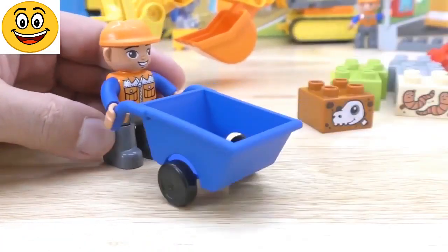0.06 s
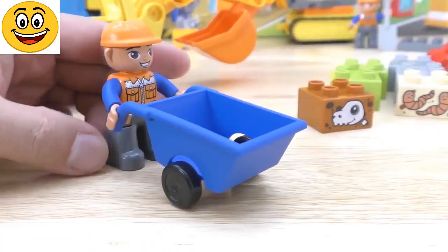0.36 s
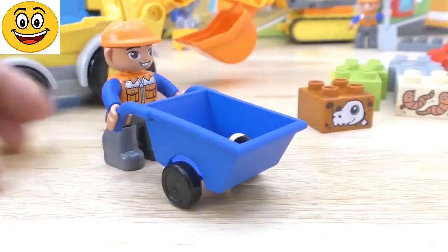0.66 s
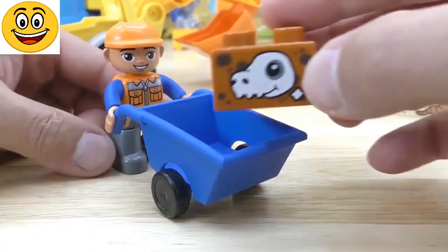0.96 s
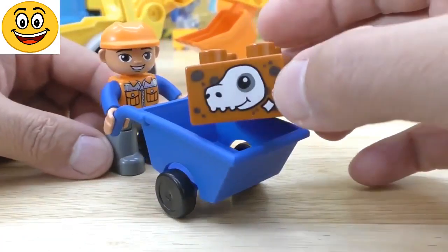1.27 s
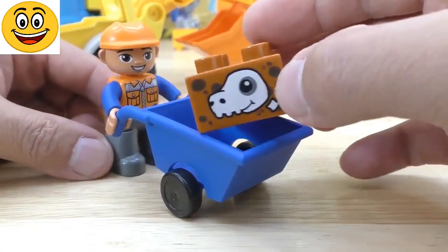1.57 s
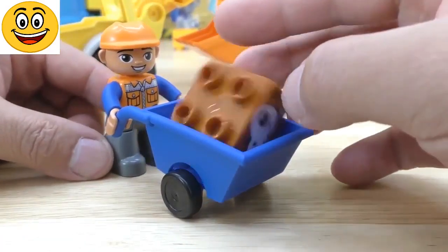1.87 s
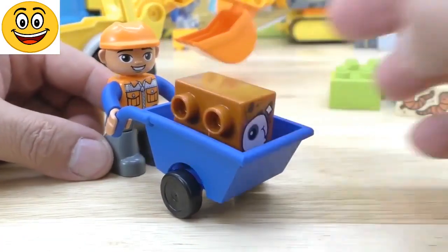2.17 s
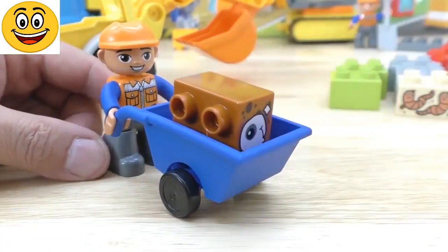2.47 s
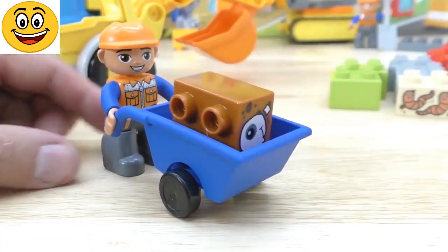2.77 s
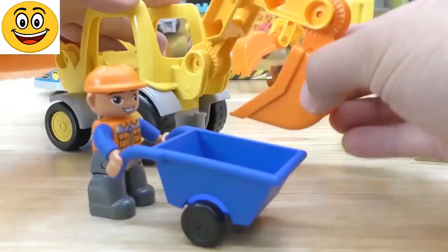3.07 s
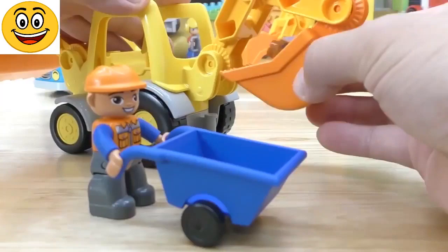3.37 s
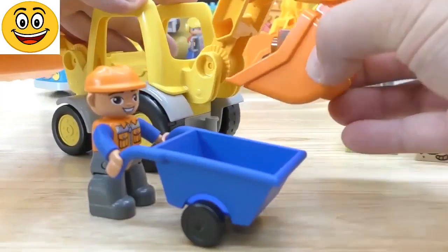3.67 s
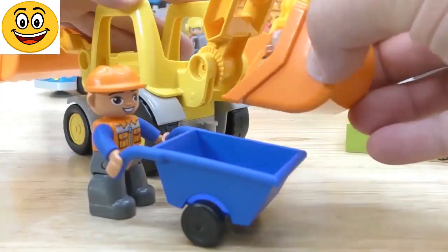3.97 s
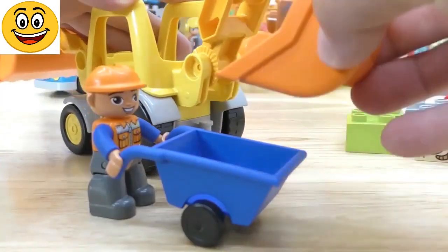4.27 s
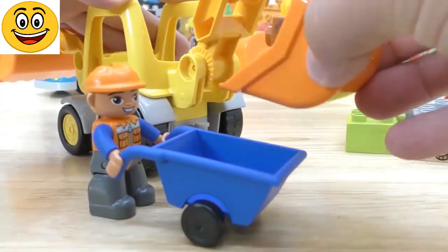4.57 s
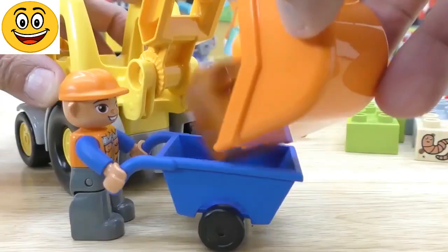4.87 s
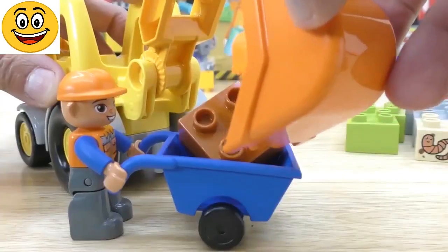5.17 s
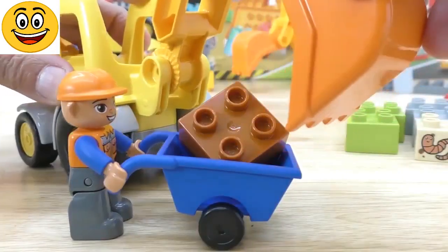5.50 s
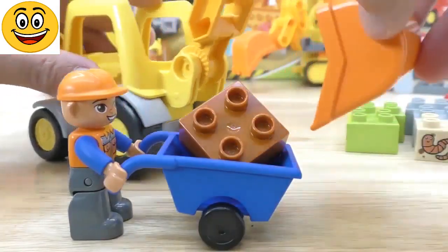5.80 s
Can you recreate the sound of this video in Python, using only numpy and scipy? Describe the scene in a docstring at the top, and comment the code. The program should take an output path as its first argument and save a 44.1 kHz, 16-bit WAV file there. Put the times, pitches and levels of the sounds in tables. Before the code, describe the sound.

Hard plastic toy bricks clatter into a toy wheelbarrow, and a toy digger's arm creaks and clicks, close up on a wooden table.

```python
"""At a wooden table in a small room, plastic toys are played with close to the microphone.
A hollow brick drops into a toy wheelbarrow and rings as it bounces. A digger's jointed arm creaks and
clicks as its joints stick and slip, then its shovel tips a second brick in. Firm blows thump the table.
Fingers and toys rub between the clicks, over a faint rumble and hiss."""
import sys
import numpy as np
from scipy import signal
from scipy.fft import rfft, irfft
from scipy.io import wavfile

SR = 44100
rng = np.random.default_rng(int(sys.argv[2]) if len(sys.argv) > 2 else 0)


def to_wav(sig):
    """Store sig (one row per channel, or 1-D mono) as 16-bit WAV at the path in sys.argv[1].

    Samples outside -1..1 are clipped; the rate is SR.
    """
    pcm = np.clip(np.atleast_2d(sig), -1, 1) * 32767
    pcm = np.round(pcm).astype(np.int16)
    wavfile.write(sys.argv[1], SR, pcm.T)  # frames by channels


N = 266364
TIME = np.arange(N) / SR
BLOW_TIME = np.arange(SR // 5) / SR  # the seconds within one blow

# Brick, barrow and shovel knock together.
# Each row: start in seconds, ring level in dB, tick level in dB, favoured pitch in Hz.
KNOCKS = [(0.608, -60.5, -68.5, 1420), (1.2646, -63, -68.5, 1420), (1.3217, -63, -73, 2780),
          (1.3699, -54, -73, 1480), (1.3983, -40.5, -53.5, 2690), (1.899, -49.5, -61, 1640),
          (1.9431, -46, -73, 2090), (1.955, -56, -59.5, 2030), (2.0747, -35, -43.5, 2080),
          (2.083, -26.5, -35, 2140), (2.1044, -36, -52, 3080), (2.1163, -37, -39, 4050),
          (2.181, -50, -61, 2200), (2.206, -38.5, -44, 2760), (2.2285, -43, -43, 1530),
          (2.2744, -52, -63, 1900), (2.6168, -57, -60, 1420), (4.9529, -57.5, -64, 4100),
          (5.005, -50, -63, 1890), (5.0096, -43.5, -44, 1830), (5.0793, -51, -59, 1770),
          (5.1256, -30.5, -38.5, 3260), (5.136, -42, -42, 1600), (5.1428, -31, -33, 2580),
          (5.2423, -51, -66, 2020), (5.4132, -49, -52, 2027), (5.6823, -55, -82, 1530),
          (6.0183, -51.5, -59.5, 2110)]
# The joints of the digger's arm slip.
# Each row: start in seconds, then the levels in dB of the hollow tone, the wall ring and the tick.
SLIPS = [(3.0565, -65, -47, -55), (3.0657, -62, -37.5, -43), (3.0847, -65, -47, -46.5),
         (3.1116, -61, -40, -47.5), (3.1231, -50, -42, -45), (3.1317, -63, -44, -46),
         (3.1925, -36.5, -44, -49), (3.2041, -40, -44.5, -49.5), (3.222, -55, -46.5, -50.5),
         (3.27, -41.5, -51, -55), (3.4051, -36.5, -46.5, -45), (3.4209, -60, -40.5, -45),
         (3.433, -51, -53, -52), (3.4534, -37, -50, -46.5), (3.461, -36.5, -39.5, -53),
         (3.4683, -39, -38, -45), (3.4818, -42, -50, -56), (3.5214, -39, -44.5, -56.5),
         (3.5414, -45.5, -47, -62), (3.5748, -56, -46.5, -56), (3.6036, -44, -54, -61),
         (3.615, -43.5, -54.5, -66), (3.648, -49.5, -63, -78), (4.1069, -39.5, -40, -38),
         (4.126, -37, -46, -56), (4.1515, -38, -41.5, -46.5), (4.1587, -58, -41.5, -45.5),
         (4.1692, -60, -43.5, -44), (4.2587, -39.5, -40, -46), (4.264, -35.5, -38, -33.5),
         (4.3084, -36, -45.5, -44.5), (4.3237, -47, -51, -58), (4.373, -45.5, -53, -60),
         (4.4, -38.5, -40, -45), (4.6635, -46.5, -49, -39.5), (4.7047, -47.5, -66, -65)]
# The tones of brick and barrow. Each row: pitch in Hz, level in dB, fade time in seconds.
BRICK_TONES = [(1037, -40, 0.016), (1400, -19, 0.032), (1608, -1, 0.1), (1982, 7, 0.026),
               (2060, -11, 0.023), (2489, 18, 0.0074), (2763, -7, 0.055), (3060, -1, 0.018),
               (3190, 1.5, 0.026), (3220, -23, 0.0068), (3977, -5, 0.104), (4015, 5.5, 0.03)]
# The noise colours of hard contact and of thin shells. Each row: frequency in Hz, level in dB.
TICK_COLOUR = [(500, -29), (1500, -15.5), (4000, 2.5), (6000, -1.5), (8000, -7), (11000, -4),
               (14000, -11.5), (16000, -22)]
SHELL_COLOUR = [(300, -8.5), (650, -31), (1100, 8), (2000, 6.5), (3200, 9), (4500, -23), (7000, -29)]


def gain(db):
    """Turn decibels into a number to multiply by."""
    return 10 ** (np.asarray(db) / 20)


def fade(t, t60):
    """Die away by 60 dB in t60 seconds, the fade time."""
    return np.exp(-np.log(1000) * t / t60)


def noise(colour, size):
    """Noise of average (rms) level 1; its colour says how strong each frequency is."""
    hz, db = np.transpose(colour)
    freqs = np.maximum(np.fft.rfftfreq(size, 1 / SR), 1)
    shape = gain(np.interp(np.log(freqs), np.log(hz), db))
    sound = irfft(rfft(rng.standard_normal(size)) * shape, size)
    return sound / sound.std()


def wander(per_s):
    """A value that drifts at random, by about 1 either way."""
    points = rng.standard_normal(int(N / SR * per_s) + 2)
    return np.interp(TIME * per_s, np.arange(len(points)), points)


def at_level(x, db, first_s=0.0055):
    """Scale a blow so that its first moments have the given average level."""
    return x * gain(db) / np.sqrt(np.mean(x[:int(first_s * SR)] ** 2))


def add(track, start, x):
    """Mix a sound into a track, start seconds in."""
    i = max(int(start * SR), 0)
    track[i:i + len(x)] += x[:max(N - i, 0)]


def cut_lows(x, hz):
    """Weaken everything below hz."""
    return signal.sosfilt(signal.butter(2, hz, "high", fs=SR, output="sos"), x)


def ring(tones, scatter_db, detune, spot_hz=2000, spot_db=0, spot_width=0.17):
    """A struck object's fading tones vary by chance; the spot that is hit favours those near spot_hz."""
    hz, db, t60 = np.transpose(tones)
    weight, stretch, sign = rng.standard_normal((3, len(hz)))
    db = db + scatter_db * weight + spot_db * np.exp(-(np.log(hz / spot_hz) / spot_width) ** 2)
    hz = hz * (1 + detune * stretch)
    waves = np.sin(2 * np.pi * hz[:, None] * BLOW_TIME) * fade(BLOW_TIME, t60[:, None])
    return (np.sign(sign) * gain(db)) @ waves


def burst(colour, t60):
    """Countless overlapping tones blur into a short puff of noise."""
    return at_level(noise(colour, len(BLOW_TIME)) * fade(BLOW_TIME, t60), 0)


def contact(x, rise_s):
    """The sound builds up while two surfaces press together."""
    return x * (1 - np.exp(-BLOW_TIME / rise_s))


def stroke(start, end):
    """A hand movement speeds up and slows down again."""
    return np.sin(np.pi * np.clip((TIME - start) / (end - start), 0, 1))


def stereo(mid, side, side_db, side_top_hz):
    """Two close microphones, left and right; the treble is nearly the same in both."""
    side = gain(side_db) * signal.sosfiltfilt(signal.butter(1, side_top_hz, fs=SR, output="sos"), side)
    return np.array([mid + side, mid - side])


def background(hiss_db=-14.5):
    """Background rumble and hiss are turned down around the loud clicks, then come back."""
    # The colours of the three noises. Each row: frequency in Hz, level in dB.
    rumble_colour = [(20, -18), (45, 2.5), (80, 4.5), (130, -4), (200, -4), (400, -13), (1000, -81)]
    air_colour = [(30, -27), (100, -9), (190, 3), (270, 1.5), (370, 1.5), (650, -8.5), (1200, -4.5),
                  (2000, -4.5), (2700, -10), (4200, -18), (8000, -24), (16000, -20.5)]
    hiss_colour = [(1500, -57), (3500, -13), (4800, -15.5), (6100, 13), (8000, 1.5), (10500, 10.5),
                   (13000, 8.5), (16000, -17)]
    # How far the background is turned up or down.
    # Each row: time in seconds, rumble level in dB, air level in dB.
    loudness = [(0.0, -75.5, -65), (0.85, -79.5, -67), (1.08, -70.5, -67), (2.05, -70.5, -64.5),
                (2.35, -76.5, -69), (3.05, -75.5, -65.5), (3.22, -96, -76), (4.0, -90, -69.5),
                (4.55, -87, -74), (5.03, -79, -65.5), (5.3, -90, -77), (6.04, -82, -68.5)]
    times, *levels = np.transpose(loudness)
    rumble_db, air_db = (np.interp(TIME, times, db) for db in levels)
    mid, side = (gain(rumble_db + 2.45 * wander(27)) * noise(rumble_colour, N)
                 + gain(air_db + 1.8 * wander(14)) * noise(air_colour, N) for _ in range(2))
    hiss = gain(air_db + hiss_db) * noise(hiss_colour, N)
    return stereo(mid + hiss, side, side_db=-8, side_top_hz=3240)


def rubbing():
    """Sliding catches on the grain and stirs the hollow shells; each surface hisses at its own pitch."""
    # Toys and fingers slide. Each row: start and end in seconds, relative drag and hiss levels in dB,
    # hiss pitch and width in Hz.
    rubs = [(0.01, 0.19, -63, -70, 11000, 4000), (0.18, 0.311, -50.5, -65.5, 10700, 300),
            (0.724, 1.074, -62, -65, 9750, 10000), (1.792, 1.88, -58, -60, 4070, 298),
            (1.854, 2.116, -64.5, -68, 4100, 600), (2.93, 3.078, -61, -69.5, 4020, 3000),
            (3.838, 3.93, -61.5, -78.5, 11500, 1500), (4.91, 5.146, -74, -66.5, 8100, 6000),
            (5.372, 5.654, -75.5, -68, 5100, 1395), (5.849, 6.14, -57.5, -69.5, 3960, 4000)]
    # The colours of sliding toys and of skin. Each row: frequency in Hz, level in dB.
    slide_colour = [(100, -18), (230, -11), (360, 6), (700, -8), (1150, 5.5), (2000, -3.5), (3100, -8),
                    (3800, -18), (8000, -26.5), (16000, -31)]
    skin_colour = [(1000, 5.5), (3000, 11), (4200, 7.5), (7000, 1), (10700, 7), (13000, 4), (16000, -11)]
    shell = signal.fftconvolve(noise(slide_colour, N), ring(BRICK_TONES, scatter_db=1, detune=0.003))[:N]
    drag = noise(slide_colour, N) + gain(-4) * shell / shell.std()
    out, skin = np.zeros(N), noise(skin_colour, N)
    for start, end, drag_db, hiss_db, hz, width_hz in rubs:
        hiss = signal.lfilter(*signal.iirpeak(hz, hz / width_hz, fs=SR), skin)
        hiss = hiss / hiss.std() + gain(-10) * skin
        out += stroke(start, end) * (gain(drag_db) * drag + gain(hiss_db) * hiss)
    grain = gain(3 * wander(350) - 6)
    return grain * out


def handling(per_s=14, loudest_db=-67, range_db=14):
    """Loose parts of the held toys give tiny ticks at random moments."""
    out = np.zeros(N)
    for when, softness in rng.random((int(per_s * N / SR), 2)):
        click = burst(SHELL_COLOUR, t60=0.011) + gain(-21) * burst(TICK_COLOUR, t60=0.017)
        add(out, when * N / SR, gain(loudest_db - range_db * softness) * click)
    return out


def brick():
    """The hollow brick strikes, bounces and settles in the barrow, ringing at each knock."""
    # The plastic's purest tones outlast the clack. Each row: pitch in Hz, level in dB, fade in seconds.
    lasting_tones = [(1993, -9, 0.12), (2570, -16, 0.049), (3180, -5.5, 0.15), (4010, -4, 0.13)]
    out = np.zeros(N)
    for start, ring_db, tick_db, hz in KNOCKS:
        tones = ring(BRICK_TONES, scatter_db=3, detune=0.0014, spot_hz=hz, spot_db=13.5, spot_width=0.1)
        struck_face = ring([(hz, 0, 0.018)], scatter_db=0, detune=0.0038)
        clack = at_level(tones, 0) + at_level(struck_face, -2) + gain(-5) * burst(SHELL_COLOUR, t60=0.049)
        clack *= fade(BLOW_TIME, 0.1)  # touching the barrow quiets the walls
        after_ring = at_level(ring(lasting_tones, scatter_db=3, detune=0.002), -14.5)
        body = cut_lows(clack + after_ring, hz * 0.5)  # a stiff corner hardly stirs the low tones
        body = at_level(contact(body, rise_s=0.000068), ring_db)
        add(out, start, body + gain(tick_db) * tick(t60=0.014, edge_db=-6.5))
    return out


def tick(t60, edge_db, usual_hz=6100, scatter_octaves=0.15):
    """Hard edges meet with a bright crack and a brief ring; the pitch depends on which edges touch."""
    # The tones of small stiff edges. Each row: pitch in Hz, level in dB, fade time in seconds.
    edge_tones = [(5080, 2, 0.02), (4900, -30, 0.017), (5490, -1, 0.034), (5740, 0.5, 0.017),
                  (6630, -19, 0.0077), (6640, 5.5, 0.02), (7480, 3, 0.0086), (7400, -12, 0.009),
                  (8970, 8.5, 0.011), (10400, -10, .009), (10700, -32, 0.0073), (12000, -11, 0.0052)]
    hz = np.clip(usual_hz * 2 ** (scatter_octaves * rng.standard_normal()), SR / 10, SR / 3)
    edge = ring(edge_tones, scatter_db=2, detune=0.0544, spot_hz=hz, spot_db=6.5, spot_width=0.032)
    crack = burst(TICK_COLOUR, t60)
    pitched_crack = signal.lfilter(*signal.iirpeak(hz, 3.5, fs=SR), crack)
    click = crack + at_level(pitched_crack, -15.5) + at_level(edge, edge_db)
    return at_level(contact(click, rise_s=0.00037), 0)


def thuds(share_db=-20):
    """The brick's weight gives each knock a dull thud with no clear pitch."""
    # The colour of a thud. Each row: frequency in Hz, level in dB.
    thud_colour = [(20, 0), (50, 6.5), (150, 5), (350, 5), (600, -1.5), (1050, -7), (1500, -23),
                   (3000, -60)]
    out = np.zeros(N)
    for start, db, _, _ in KNOCKS:
        add(out, start, gain(db + share_db) * contact(burst(thud_colour, t60=0.038), rise_s=0.00032))
    return out


def thump(db, hz, t60):
    """A struck board gives three short tones and little sound below its main pitch."""
    tones = ring([(hz, 0, t60), (hz * 0.58, -11, t60), (hz * 1.9, -12, t60 / 2)],
                 scatter_db=2.5, detune=0.028)
    return at_level(cut_lows(tones, hz * 0.75), db, first_s=0.03)


def table_thumps(barrow_hz=366.4, digger_hz=176.4):
    """The table answers blows with low thumps, louder for harder ones; the barrow's tub knocks once."""
    # The digger's wheels bump softly on the table. Each row: start in seconds, level in dB.
    wheel_bumps = [(2.617, -63.5), (2.984, -64), (3.739, -65), (3.876, -69), (4.108, -55.5), (5.415, -57),
                   (5.89, -67)]
    knocks = [(start, db) for start, db, _, _ in KNOCKS]
    slips = [(start, wall_db) for start, _, wall_db, _ in SLIPS]
    out = np.zeros(N)
    for start, db in knocks:
        add(out, start, thump(db - 33.5, barrow_hz, t60=0.13))
    for start, db in slips:
        add(out, start, thump(db - 25, digger_hz, t60=0.13))
    for start, db in wheel_bumps:
        add(out, start, thump(db, digger_hz, t60=0.13))
    for start, db in knocks + slips:  # the whole table top bends briefly
        add(out, start, thump(db - 35.5, hz=127, t60=0.04))
    add(out, 2, thump(db=-46.5, hz=1080, t60=0.04))  # the first brick reaches the floor of the tub
    return out


def creaking(spread_db=9):
    """Plastic sticks and slips on plastic: crowds of tiny uneven jerks shake the thin shells."""
    # The creaks. Each row: start and end in seconds, level in dB, jerks per second.
    creaks = [(2.145, 2.312, -57, 980), (3.031, 3.205, -59, 2100), (3.39, 3.585, -57.5, 1400),
              (4.11, 4.182, -58.5, 1800), (4.28, 4.433, -59, 1100), (5.184, 5.333, -64.5, 1650)]
    out = np.zeros(N)
    for start, end, db, per_s in creaks:
        chance, softness = rng.random((2, N))
        strength = gain(-spread_db * np.log(0.029 + softness))
        jerks = (chance < per_s / SR) * strength * stroke(start, end)
        one_jerk = burst(SHELL_COLOUR, t60=0.012) + gain(-6) * burst(TICK_COLOUR, t60=0.012)
        creak = signal.fftconvolve(jerks, one_jerk)[:N]
        average_level = np.sqrt(1e-18 + np.sum(creak ** 2) / ((end - start) * SR))
        out += gain(db) * creak / average_level
    return out


def digger_arm(hollow_hz=1343.4, hz_per_db=2, grip_hz=24.2):
    """Each slip of a joint rings the hollow arm, whose pitch shifts with the grip."""
    # The walls of the arm and shovel. Each row: pitch in Hz, level in dB, fade time in seconds.
    wall_tones = [(1617, 16, 0.012), (1865, 15.5, 0.008), (2260, 6, 0.04), (2700, -34.5, 0.0098),
                  (3044, -14, 0.03), (3118, 2.5, 0.037), (3880, 13, 0.0065), (4150, -2, 0.091)]
    out = np.zeros(N)
    for start, hollow_db, wall_db, tick_db in list(SLIPS) + faint_slips():
        grip, spot = rng.standard_normal(2)
        # A harder slip stiffens the joint and raises the hollow tone.
        hz = hollow_hz + hz_per_db * (tick_db + 45.5) + grip_hz * grip
        hollow = ring([(hz, 0, 0.022), (hz * 1.197, -13, 0.018), (1300, -19, 0.07)],
                      scatter_db=3, detune=0.0077)
        hollow = at_level(contact(hollow, rise_s=0.0012), hollow_db)
        wall_hz = 3190 * 2 ** (0.046 * spot)
        wall = ring(wall_tones, scatter_db=3, detune=0.036, spot_hz=wall_hz, spot_db=13, spot_width=0.099)
        wall = at_level(wall, 0) + gain(-5.5) * burst(SHELL_COLOUR, t60=0.028)
        wall *= fade(BLOW_TIME, 0.068)  # the fingers quiet the walls
        wall = at_level(contact(wall, rise_s=0.0005), wall_db)
        add(out, start, hollow + wall + gain(tick_db) * tick(t60=0.017, edge_db=-2))
    return out


def faint_slips(per_s=16, range_db=6):
    """As the arm bends, its joints also give in small, loosely spaced slips, listed as in SLIPS."""
    # The bends of the arm. Each row: start and end in seconds, level in dB.
    bends = [(3.129, 3.3, -48.5), (3.491, 3.64, -53), (4.325, 4.37, -50), (4.419, 4.62, -62.5)]
    rows = []
    for start, end, db in bends:
        for k, (late, size) in enumerate(rng.random((12, 2))):
            when = start + (k + late) / per_s
            level = db + range_db * (size - 0.5)
            if when < end:
                rows.append((when, level, level - 11.5, level - 17))
    return rows


def room_echo(x, near_db, near_t60, far_db):
    """Sound bounces quickly off the table and nearby toys, then lingers between the walls."""
    # How the room dies away. Each row: frequency in Hz, fade time in seconds, level in dB.
    bands = [(180, 0.39, -15), (357, 1, 4.5), (666, 0.12, 5.5), (1400, 0.34, 2.5), (2850, 0.43, 3.5),
             (5200, 0.35, 6.5), (10300, 0.35, 0.5)]
    t = np.arange(SR) / SR
    hz, fade_times, levels = np.transpose(bands)
    log_freqs = np.log(np.maximum(np.fft.rfftfreq(SR, 1 / SR), 1))
    spectra = rfft(rng.standard_normal((2, SR)))
    tail = np.zeros((2, SR))
    for band, t60, db in zip(np.eye(len(hz)), fade_times, levels):
        band_noise = irfft(spectra * np.interp(log_freqs, np.log(hz), band), SR)
        tail += band_noise * fade(t, t60) * gain(db)
    tail *= np.clip((t - 0.006) / 0.025, 0, 1)  # echoes from the walls take time to build up
    near = rng.standard_normal((2, SR)) ** 3 * fade(t, near_t60) * (t > 0.002)
    echoes = gain(near_db) * near / np.linalg.norm(near[0]) + gain(far_db) * tail / np.linalg.norm(tail[0])
    return signal.fftconvolve(x[None], echoes, axes=1)[:, :N]


def scene():
    """The toys sit just left of the middle; the table's thumps come more from the right."""
    toys = brick() + digger_arm() + creaking() + rubbing() + handling()
    thumps = table_thumps() + thuds()
    echo_mid, echo_side = room_echo(toys + thumps, near_db=-9.5, near_t60=0.062, far_db=-17.5)
    side = echo_side + gain(-11.5) * toys - gain(-9) * thumps
    return stereo(toys + thumps + echo_mid, side, side_db=-6, side_top_hz=6480) + background()


def record(dry, top_hz=16200):
    """The very highest treble is cut away."""
    return signal.sosfilt(signal.ellip(8, 0.2, 70, top_hz, fs=SR, output="sos"), dry)


dry = scene()
out = record(dry)
to_wav(out)
```